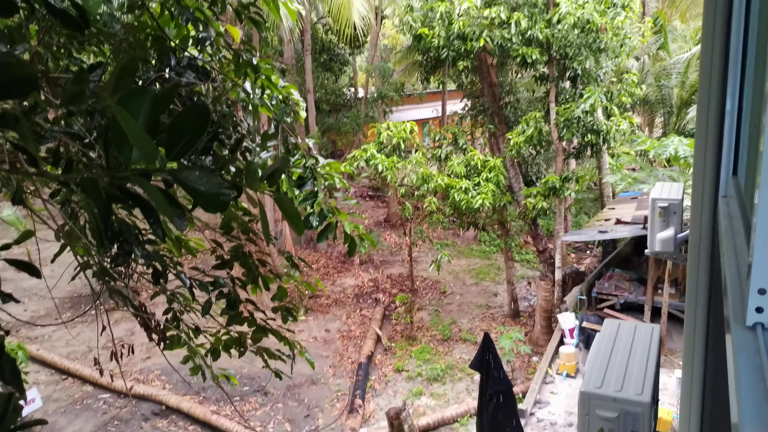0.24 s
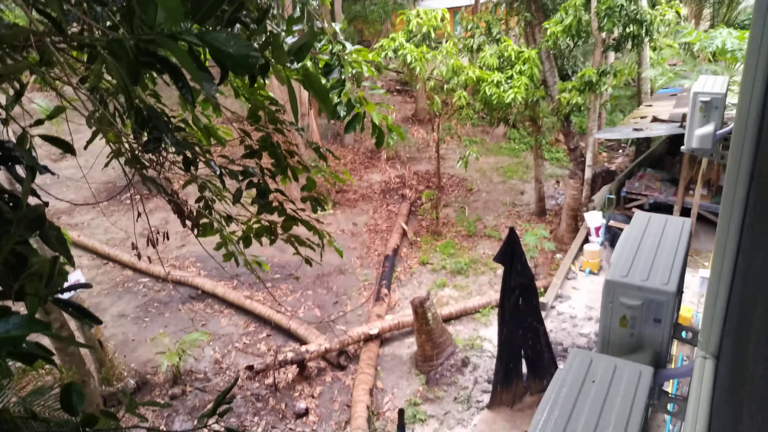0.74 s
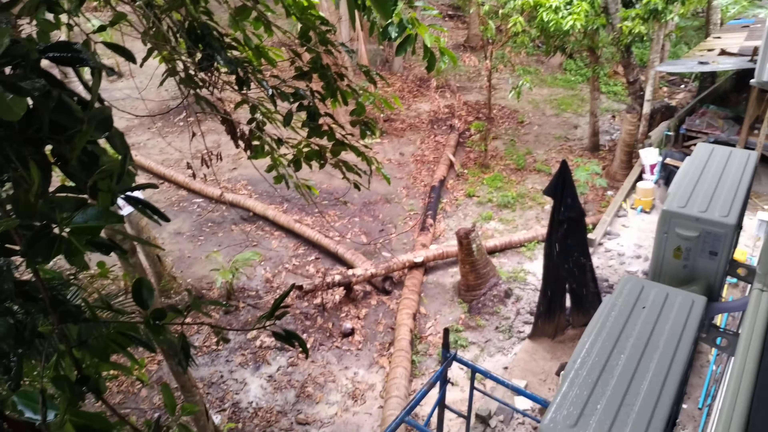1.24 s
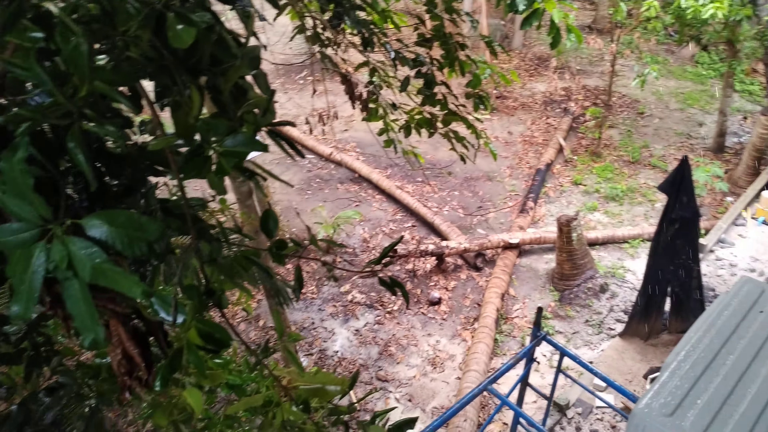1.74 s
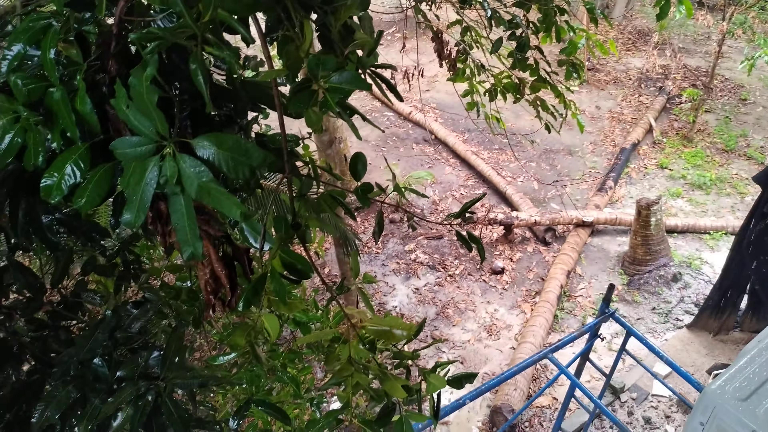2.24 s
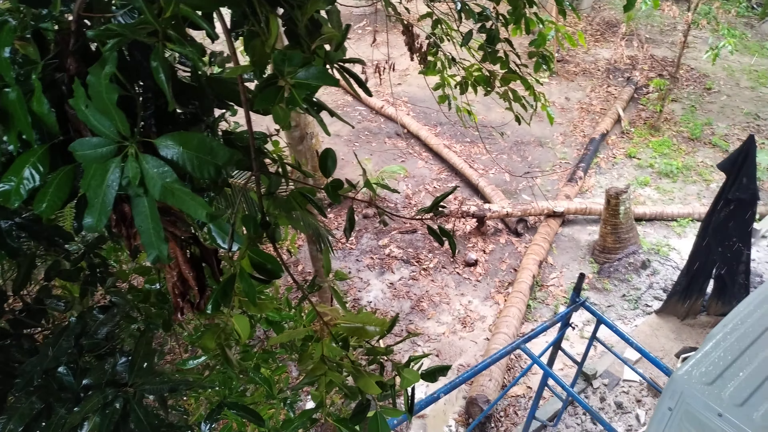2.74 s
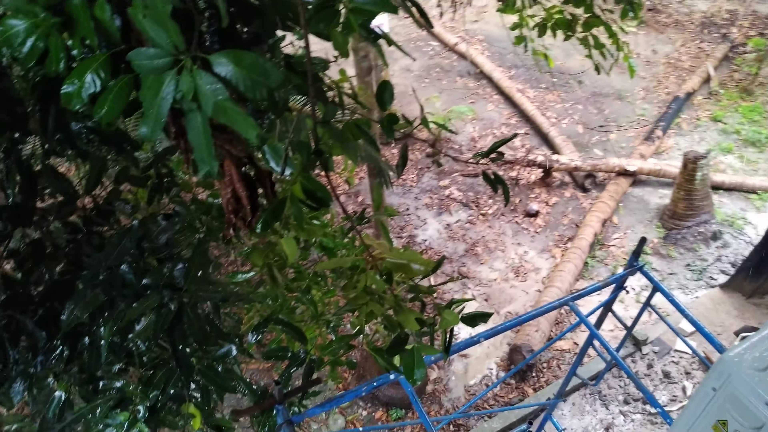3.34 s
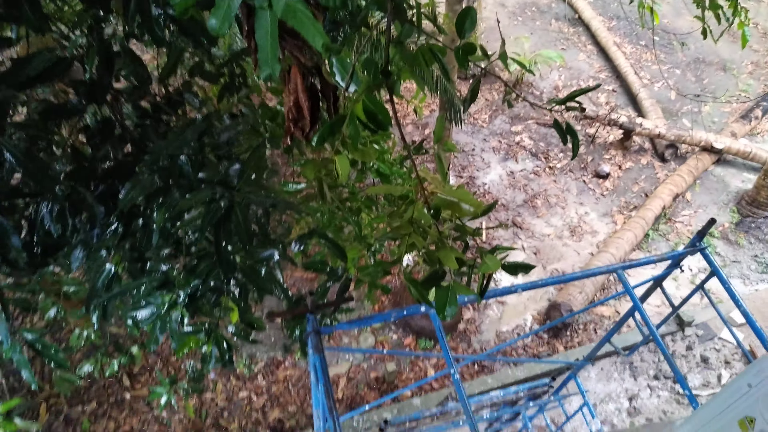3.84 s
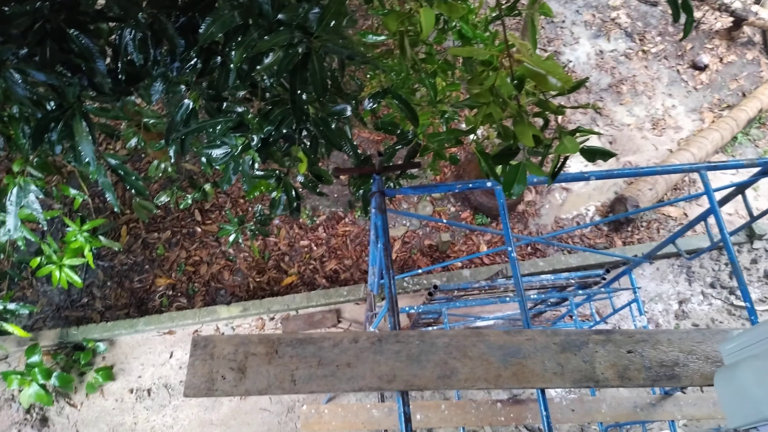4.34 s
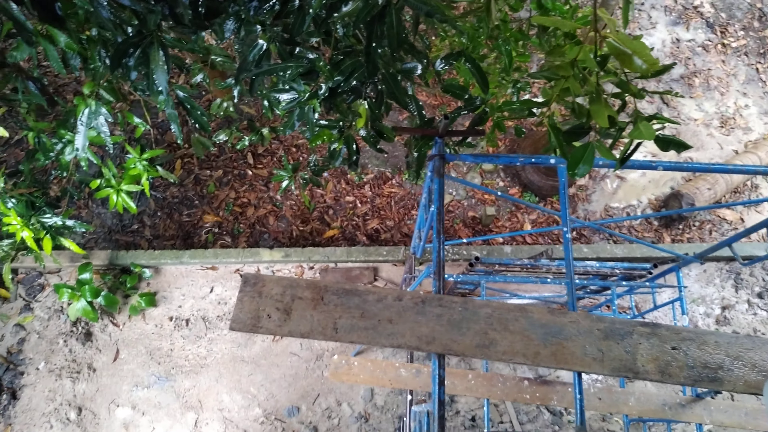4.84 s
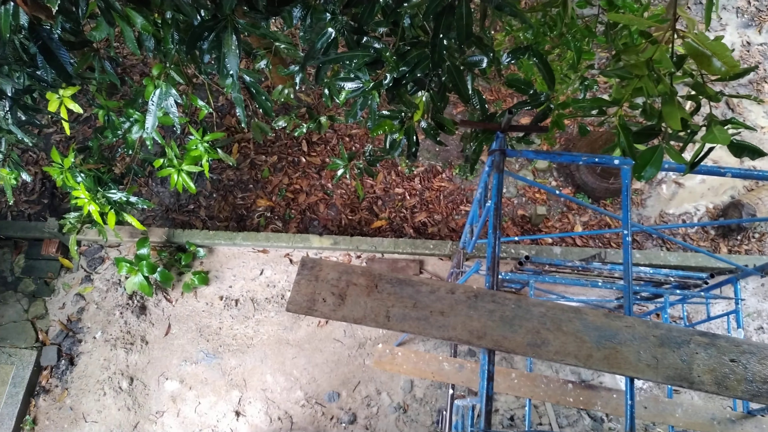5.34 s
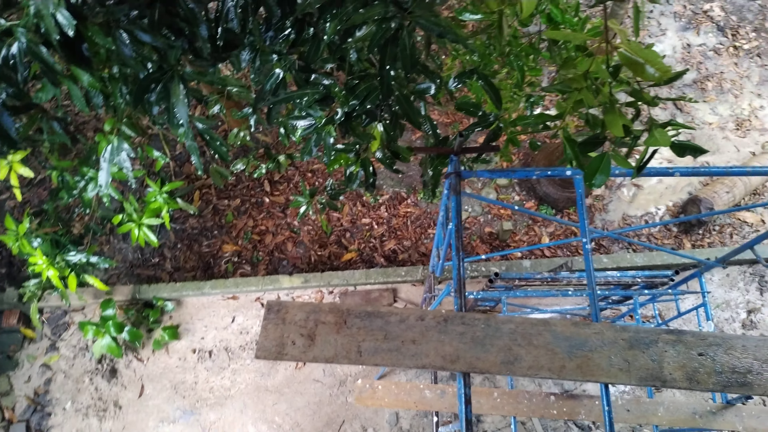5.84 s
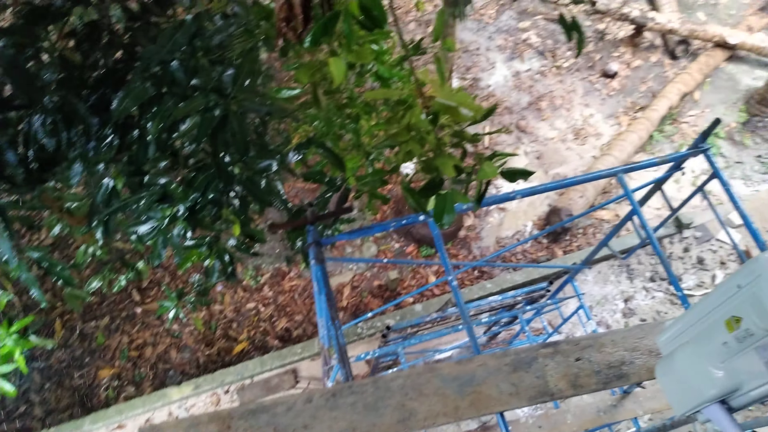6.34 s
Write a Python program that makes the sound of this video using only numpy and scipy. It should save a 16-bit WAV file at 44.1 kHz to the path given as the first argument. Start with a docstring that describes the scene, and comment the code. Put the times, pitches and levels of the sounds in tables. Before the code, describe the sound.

Outdoor stereo rain, bright and sizzling, captured by a handheld phone close to wet foliage. Fat drops slap leaves and burst into short sprays over countless merged distant drops. A sharp tap comes near the middle, followed by case bumps, a strong low puff on the right and a droplet clicking on the phone. The later part is denser and crisper, with more close ticks, a faint hum and a left-leaning gust.

```python
"""Heavy rain on a garden: fat drops slap near leaves and burst into spray, made of noise-like showers that thin out.
Close droplets tick as short resonant snaps, one drop raps on something hard, and countless far drops
merge into a flickering wash with pats, plops, plips and drizzle in front of it.
It is heard from a phone held out of an upstairs window: air rumbles and puffs on its two microphone ports,
its case knocks, a low hum fades in, and the ringing of the ports makes the rain sizzle."""
import sys
import numpy as np
from scipy import signal
from scipy.fft import rfft, irfft, next_fast_len
from scipy.io import wavfile
from scipy.ndimage import uniform_filter1d

SR = 44100
rng = np.random.default_rng(int(sys.argv[2]) if len(sys.argv) > 2 else 0)


def store_wav(level_fs):
    """Save 16-bit WAV to argv[1]."""
    pcm = np.round(np.clip(np.atleast_2d(level_fs), -1, 1) * 32767)
    wavfile.write(sys.argv[1], SR, pcm.T.astype(np.int16))


N = 290619
T = np.arange(N) / SR  # time of each sample, s

# A faint low hum that comes in as the phone tilts down
HUM_HZ, HUM_WIDTH_HZ, HUM_DB = 146, 9, -62.5
HUM_START_S, HUM_RISE_S = 3.85, 0.4
# Breeze on the ports: usual level and the size of its slow swell
BREEZE_DB, BREEZE_SWELL_DB = -57.5, 2.5
# Gusts on top of the breeze: [t/s, half length/s, level/dB, left minus right/dB]
GUST_TABLE = [(.12, 0.2, -47.5, -3), (.57, .15, -46.5, -4), (1.25, .15, -51, -3), (2.8, .2, -50, 7),
              (3.5, 0.26, -50, 1), (5.41, .14, -41.5, 18), (5.4, .05, -37, 20), (5.535, 0.04, -35.5, -12),
              (5.6, .03, -40, 0)]
# Sudden puffs of air on the right port, before filtering:
# [t/s, peak pressure swing/full scale, half length/s, turbulence level/dB]
PUFF_TABLE = [(0.649, 0.014, 0.0044, -57), (3.4396, 0.047, 0.0017, -40), (3.4836, 0.04, 0.0014, -44),
              (3.797, -0.05, 0.014, -52), (3.8003, -0.42, 0.0049, -30.5), (3.8075, 0.165, 0.0011, -31)]
# Knocks on the phone's case as the grip shifts: [t/s, level/dB, hardness of the contact f/Hz]
KNOCK_TABLE = [(3.4375, -8, 2000), (3.4437, -11, 3200), (3.4462, -14, 3200), (3.4817, -15, 380),
               (3.7925, -10, 1500), (3.8037, -7, 600), (3.8063, -2, 900)]
# Tones the case rings with: [f/Hz, width/Hz, relative level/dB]
CASE_TONES = [(160, 60, 11), (262, 75, 9), (373, 130, -2), (674, 160, -5), (910, 180, -8), (1300, 260, -3)]
PHONE_HIT_S = 3.9983

# Far rain on trees and ground: [f/Hz, level/dB per Hz]
WASH_SPECTRUM = [(30, -70), (70, -84), (105, -79.5), (150, -82), (220, -84), (400, -83.5), (700, -84),
                 (1200, -81), (2200, -78.5), (3500, -83.5), (6000, -87), (9000, -91), (14000, -91)]
# Fine drizzle on near foliage, before its small swells: [t/s, level/dB]
DRIZZLE_LEVEL = [(0, -49), (1, -50.5), (1.8, -50), (2.6, -48.5), (3.6, -47), (4.2, -44.5), (5.3, -44.5),
                 (6.6, -46.5)]
# Tones of the hard surface: [f/Hz, width/Hz, relative level/dB]
RAP_TONES = [(765, 190, -2.5), (1040, 540, -3.5), (1490, 250, -9), (1880, 220, -9)]
RAP_S = 3.0293

# The closest droplets, and at 3.0395 s the big drop's small rebound after its rap: [t/s, level/dB, pitch f/Hz,
# left minus right/dB]
TICK_TABLE = [(0.254, -20, 9000, 2), (.2549, -9.5, 3280, -4), (.406, -20, 4500, -1), (.56, -21, 300, 0),
              (.607, -20, 1450, 0), (1.027, -16, 12500, 5), (1.027, -22, 4500, -2), (1.038, -24, 12500, 6),
              (1.14, -20, 12500, 6), (2.105, -18, 10800, 3), (2.131, -22, 480, -2), (2.162, -21, 2100, 3),
              (2.305, -15.5, 6400, 0), (2.317, -21, 2200, 3), (2.4072, -22.5, 10400, 8),
              (3.0395, -19, 1100, 5), (3.0395, -22, 9500, 6), (3.7247, -14.5, 12600, 9),
              (3.7347, -19, 9000, 3), (3.839, -17, 2100, 4), (3.8398, -18.5, 1000, 6),
              (3.9547, -11, 4900, -6), (4.0725, -19.5, 8400, -6), (4.249, -19, 12500, 6),
              (4.306, -14.5, 3940, -4), (4.4066, -16.5, 8700, -4), (4.4623, -16, 8450, -9),
              (4.746, -16, 4050, -8), (4.7462, -19, 8000, -10), (4.871, -19, 10300, 10),
              (4.962, -17, 1300, 0), (5.1604, -18, 8900, -3), (5.1604, -24, 12500, 6),
              (5.43, -22, 10300, 8), (5.544, -18, 8600, -7), (5.6453, -17.5, 11000, 16),
              (5.838, -21, 5200, -3), (5.892, -16.5, 1500, 4), (5.947, -18, 5600, -7),
              (6.021, -17, 1850, 6), (6.0322, -13, 1900, 4), (6.0903, -10, 11400, 6),
              (6.1003, -16, 11600, 0), (6.145, -14.5, 8100, 2), (6.147, -17, 2200, 2),
              (6.162, -16, 4900, -7), (6.3916, -16.8, 9900, 3), (6.4004, -13.5, 6000, -5),
              (6.4004, -19, 12200, 0), (6.406, -21, 1100, 0)]
TICK_CYCLES = 6.3  # the first snap of every tick fades over the same number of cycles
# Fainter droplets fall at random times, pitches and sides
STRAY_DB, STRAY_LO_HZ, STRAY_HI_HZ, STRAY_PAN_DB = -28, 2500, 7500, 9

# The fattest drops on near leaves, before the rise and decay: [t/s, spray level/dB, leaf slap level/dB]
SPLAT_TABLE = [(0.247, -36, -34), (0.394, -38, -41), (0.495, -39.5, -45), (0.655, -41, -55),
               (0.835, -50, -40), (1.016, -39, -44), (1.135, -40.5, -54), (1.313, -37, -42),
               (1.489, -37.5, -57), (1.735, -42, -52), (2.099, -37.5, -40), (2.232, -38, -40),
               (2.297, -37.5, -35), (2.402, -37, -42), (2.47, -41.5, -40.5), (2.635, -40, -55),
               (2.86, -41, -52), (3.027, -35, -35), (3.069, -39, -39), (3.243, -41, -39),
               (3.368, -39.5, -46), (3.44, -38.5, -43), (3.721, -37, -38), (3.791, -38, -35),
               (3.827, -33.5, -43), (3.945, -35, -33.5), (4.039, -37, -40), (4.17, -39, -59),
               (4.238, -39, -48), (4.321, -38, -40), (4.406, -37, -52), (4.565, -39, -50),
               (4.734, -37, -37), (4.849, -36, -47), (4.917, -38, -51), (5.15, -44, -48), (5.241, -37, -53),
               (5.36, -37, -51), (5.418, -34, -41), (5.539, -37, -44), (5.825, -45, -41),
               (5.938, -41.5, -34.5), (6.046, -34, -41), (6.09, -32.5, -45), (6.137, -34.5, -36),
               (6.358, -38, -40), (6.389, -35, -47)]
# Lesser drops drip through the tree at a loose, even pace
DRIP_SPRAY_DB, DRIP_SLAP_DB, DRIP_SCATTER_DB = -45, -48.5, 1
# Where the near tree lies as the phone turns: [t/s, left minus right/dB]
TREE_SIDE_PATH = [(0, 0), (3.4, 3), (3.8, -2.5), (5.3, -0.5), (6.6, -3.5)]

# Microphone ports, left then right: [resonance f/Hz, width/Hz]
PORT_TABLE = [(10100, 880), (8570, 965)]
# How the phone's body colours each port: [f/Hz, left level/dB, right level/dB]
BODY_SHADING = [(1000, 0, 0), (1600, -0.3, -2.7), (2200, .5, -1), (3240, -2, 0.04), (3940, -2.5, 0),
                (5500, 0.9, -1), (6650, 0.5, -0.4), (8360, -0.9, 0), (10000, 0, -1.1), (12000, -0.5, 0.5),
                (13900, 2.5, 1)]
TOP_HZ = 14300


def undb(db):
    """Turn decibels into a plain gain."""
    return 10 ** (np.asarray(db) / 20)


def unit(x):
    """Scale to an rms of 1."""
    return x / np.sqrt(np.mean(x ** 2))


def pan(db):
    """Left and right gains, db apart, with the same total power whatever the side."""
    gains = undb([[db / 2], [-db / 2]])
    return unit(gains)


def band(x, lo_hz, hi_hz, order=2):
    """Keep the pitches between two edges."""
    edges = [lo_hz, min(hi_hz, SR / 2.1)]
    return signal.sosfilt(signal.butter(order, edges, "band", fs=SR, output="sos"), x)


def ring(x, hz, width_hz):
    """One resonance, with gain 1 at its centre."""
    return signal.lfilter(*signal.iirpeak(hz, hz / width_hz, fs=SR), x)


def walk(rate):
    """A wandering level: random steps, rate of them a second, smoothed twice; its spread is near 1."""
    k = int(SR / rate)
    steps = np.repeat(rng.standard_normal(N // k + 1), k)
    smooth = uniform_filter1d(uniform_filter1d(steps, k), k)
    return 1.42 * smooth[:N]


def add(out, s, sound):
    """Mix a sound in at time s."""
    i = max(int(s * SR), 0)
    out[:, i:i + sound.shape[-1]] += sound[..., :max(N - i, 0)]


def impacts(rate, spread_db):
    """Random tiny impacts, mostly small, a few large; each reaches the ports with its own lag and balance."""
    out = np.zeros((2, N))
    when, size, side = rng.random((int(rate * N / SR), 3)).T
    strength = undb(-spread_db * np.log(np.maximum(size, 1 / 40)))
    push = strength * rng.choice([-1, 1], len(size))
    at = (when * N).astype(int)
    lag = ((side - 0.5) * 36).astype(int)  # samples, up to 18 either way
    np.add.at(out[0], at, push * np.cos(side * np.pi / 2))
    np.add.at(out[1], (at - lag) % N, push * np.sin(side * np.pi / 2))
    return unit(out)


def plips(count, lo_hz, hi_hz, cycles, spread_db):
    """Random drops that each ring for some cycles at a pitch of their own."""
    out = np.zeros((2, N))
    t = T[:SR // 25]
    for when, pitch, size, length, side in rng.random((count, 5)):
        hz = lo_hz * (hi_hz / lo_hz) ** pitch
        turns = cycles * 4 ** (length - 0.5)  # from half to twice the usual cycles
        db = -spread_db * np.log(max(size, 1 / 60))
        # the nearer port hears it first and louder
        delay_s = np.array([[1 - side], [side]]) * 0.000591
        age = np.maximum(t - delay_s, 0) * hz  # in cycles
        tone = np.sin(2 * np.pi * age) * np.exp(-age / turns)
        add(out, when * N / SR, undb(db) * pan(12 * (side - 0.5)) * tone)
    return unit(out)


def burst(decay_s):
    """Up to 50 ms of dying splash noise with energy 1 at each port."""
    t = T[:SR // 20]
    x = rng.standard_normal((2, len(t))) * np.exp(-t / decay_s)
    return x / np.linalg.norm(x, axis=1, keepdims=True)


def hum():
    """A faint, wavering low hum far off: a narrow band of noise, alike at both ports."""
    half_hz = HUM_WIDTH_HZ / 2
    tone = unit(band(rng.standard_normal(N), HUM_HZ - half_hz, HUM_HZ + half_hz))
    return undb(HUM_DB) * tone * np.clip((T - HUM_START_S) / HUM_RISE_S, 0, 1)


def breeze():
    """Moving air rumbles on each port alone; every gust swells and falls away smoothly."""
    power = undb(BREEZE_DB + BREEZE_SWELL_DB * walk(2.0)) ** 2
    for s, half_s, db, pan_db in GUST_TABLE:
        swell = np.exp(-((T - s) / half_s) ** 2)
        power = power + (pan(pan_db) * undb(db)) ** 2 * swell
    rumble = unit(band(rng.standard_normal((2, N)), 11.5, 45.3, order=3))
    return rumble * np.sqrt(power)


def puffs(eddy_hz=330, eddy_top_hz=1550, settle_hz=5, gap_hz=1400, gap_db=2, skirt_db=-13, skirt_s=0.028):
    """A puff swings the right port's pressure both ways; its eddies ring the opening,
    amid a softer, longer low rumble that swells before and fades after."""
    out = np.zeros((2, N))
    # small eddies are weaker than large ones
    eddies = band(rng.standard_normal(N), 120, eddy_hz, order=1)
    eddies = band(eddies, 60, eddy_top_hz, order=3)
    eddies = unit(eddies + undb(gap_db) * ring(eddies, gap_hz, 350))
    skirt = undb(skirt_db) * unit(band(rng.standard_normal(N), 79, 275))
    for s, swing, half_s, eddy_db in PUFF_TABLE:
        u = (T - s) / half_s
        out[1] += swing * u * np.exp((1 - u ** 2) / 2)
        eddy_swell = np.exp(-((T - s) / (half_s + 0.0021)) ** 2)
        skirt_swell = np.exp(-((T - s) / skirt_s) ** 2)
        out[1] += undb(eddy_db) * (eddies * eddy_swell + skirt * skirt_swell)
    return signal.sosfilt(signal.butter(2, settle_hz, "high", fs=SR, output="sos"), out)


def case(blow):
    """The phone's case answers a blow with a few tones that die quickly."""
    return sum(undb(db) * ring(blow, hz, width_hz) for hz, width_hz, db in CASE_TONES)


def knocks(contact_ratio=5.0):
    """Dull knocks push the case in beside the right port; a softer contact stirs only its lower tones."""
    out = np.zeros((2, N))
    for s, db, contact_hz in KNOCK_TABLE:
        contact = band(-signal.unit_impulse(SR // 20), contact_hz / contact_ratio, contact_hz)
        body = case(contact)
        add(out, s, undb(db) * pan(-29) * body / np.linalg.norm(body))
    return out


def phone_hit(click_db=-8, port_db=-5, bright_db=-2, thud_db=-3, case_db=-3):
    """A droplet lands on the phone beside the right port: a sharp click and a small thud in the case."""
    out = np.zeros((2, N))
    blow = signal.unit_impulse(SR // 20)
    click = undb(click_db) * band(blow, 4000, 19000, order=1)
    click += undb(port_db) * ring(blow, 9300, 900)
    click += undb(bright_db) * ring(blow, 15500, 3000)
    thud = undb(thud_db) * band(blow, 180, 2100, order=3) + undb(case_db) * case(blow)
    add(out, PHONE_HIT_S, pan(-26) * (click + thud))
    return out


def wash(flicker_db=2.0, alike_hz=520):
    """Far rain is noise in half-octave bands that flicker; long waves are more alike at both ports."""
    size = next_fast_len(N)
    hz = np.maximum(np.fft.rfftfreq(size, 1 / SR), 1)
    points, db = np.transpose(WASH_SPECTRUM)
    alike = 0.92 / (1 + (hz / alike_hz) ** 4)
    mid, side = rfft(rng.standard_normal((2, size)))
    sound = mid * np.sqrt(1 + alike) + side * np.sqrt(1 - alike) * np.array([[1], [-1]])
    sound = sound * undb(np.interp(np.log(hz), np.log(points), db)) * np.sqrt(SR) / 2
    out = 0
    for k in np.arange(9, 29):  # band centres at 2 ** (k / 2) Hz
        share = np.maximum(1 - abs(2 * np.log2(hz) - k), 0)
        out = out + irfft(sound * share, size)[:, :N] * undb(flicker_db * walk(24.98))
    return out


def patter(pat_db=-58.5, plop_db=-59.0, plip_db=-54, leaf_db=-53):
    """Mid-distance drops: dull pats on soil, rare plops on wood, bright plips on puddles, dry taps on leaves."""
    pats = plips(count=1800, lo_hz=330, hi_hz=1570, cycles=1.23, spread_db=2.5)
    plops = plips(count=110, lo_hz=623, hi_hz=1500, cycles=1.8, spread_db=1.5)
    bright = plips(count=900, lo_hz=1400, hi_hz=6300, cycles=24.0, spread_db=2.5)
    taps = plips(count=650, lo_hz=2686, hi_hz=6590, cycles=8.9, spread_db=1.0)
    return undb(pat_db) * pats + undb(plop_db) * plops + undb(plip_db) * bright + undb(leaf_db) * taps


def drizzle(swell_db=1.0):
    """Fine droplets, each a tiny impact, crackle on near foliage in small flurries."""
    db = np.interp(T, *np.transpose(DRIZZLE_LEVEL)) + swell_db * walk(28.02)
    crackle = band(impacts(rate=1400, spread_db=1.0), 5200, 21300, order=1)
    return unit(crackle) * undb(db)


def rap(crack_db=-6, bright_db=-3, body_db=8, tail_db=-2):
    """One big drop cracks on a hard surface, which rings briefly; the wall throws back a short tail."""
    out = np.zeros((2, N))
    blow = signal.unit_impulse(SR // 20) + undb(tail_db) * burst(decay_s=0.012)
    body = sum(undb(db) * ring(blow, hz, width_hz) for hz, width_hz, db in RAP_TONES)
    crack = undb(crack_db) * burst(decay_s=0.002)
    crack += undb(bright_db) * band(burst(decay_s=0.00091), 12000, 18000)
    add(out, RAP_S, pan(5.3) * band(crack + undb(body_db) * body, 450, 17000))
    return out


def ticks(width_share=0.19, scatter_db=-9, click_db=-7, count=20):
    """Close droplets: a sharp contact, a very short, loosely pitched snap and a little scatter of fragments."""
    out = np.zeros((2, N))
    strays = []
    for when, pitch, side in rng.random((count, 3)):
        hz = STRAY_LO_HZ + pitch * (STRAY_HI_HZ - STRAY_LO_HZ)
        strays.append((when * N / SR, STRAY_DB, hz, STRAY_PAN_DB * (2 * side - 1)))
    for s, db, hz, pan_db in [*TICK_TABLE, *strays]:
        splash = burst(TICK_CYCLES / hz) + undb(scatter_db) * burst(decay_s=0.0083)
        snap = ring(splash, hz, hz * width_share)
        snap = snap / np.linalg.norm(snap, axis=1, keepdims=True)
        click = band(signal.unit_impulse(SR // 20), hz, hz * 2, order=1)
        click = click / np.linalg.norm(click)
        add(out, s, undb(db) * pan(pan_db) * (snap + undb(click_db) * click))
    return out


def splats(rise_s=0.0022, spray_s=0.052, slap_s=0.03, count=33):
    """Each fat drop slaps a leaf and bursts into a shower of droplets that thins out."""
    spray_power, slap_power = np.zeros((2, N)), np.zeros((2, N))
    t = T[:SR // 3]
    onset = 1 - np.exp(-t / rise_s)
    drips = []
    for k, (late, size, leaf_size) in enumerate(rng.random((count, 3))):
        spray_db = DRIP_SPRAY_DB + DRIP_SCATTER_DB * (2 * size - 1)
        slap_db = DRIP_SLAP_DB + 2 * DRIP_SCATTER_DB * (2 * leaf_size - 1)
        drips.append(((k + late) * N / SR / count, spray_db, slap_db))
    for s, spray_db, slap_db in [*SPLAT_TABLE, *drips]:
        sides = pan(np.interp(s, *np.transpose(TREE_SIDE_PATH)))
        # separate showers add in power
        add(spray_power, s, (sides * undb(spray_db) * onset * np.exp(-t / spray_s)) ** 2)
        add(slap_power, s, (sides * undb(slap_db) * onset * np.exp(-t / slap_s)) ** 2)
    droplets = unit(band(impacts(rate=4500, spread_db=1.5), 6000, 21200, order=1))
    leaf = plips(count=6000, lo_hz=2003, hi_hz=7000, cycles=3.0, spread_db=2.0)
    return np.sqrt(spray_power) * droplets + np.sqrt(slap_power) * leaf


def scene():
    """Add all the layers: the air and phone sounds, then the rain from far to near."""
    phone_and_air = hum() + breeze() + puffs() + knocks() + phone_hit()
    rain = wash() + patter() + drizzle() + rap() + ticks() + splats()
    return phone_and_air + rain


def record(dry):
    """Each port is a small air cavity that rings in the treble; the phone's body shades it; the top is cut."""
    size = next_fast_len(N + SR // 10)
    hz = np.maximum(np.fft.rfftfreq(size, 1 / SR), 1)
    points, *shades = np.transpose(BODY_SHADING)
    out = []
    for x, (port_hz, width_hz), shade_db in zip(dry, PORT_TABLE, shades):
        cavity = port_hz ** 2 / (port_hz ** 2 - hz ** 2 + 1j * hz * width_hz)
        shade = undb(np.interp(np.log(hz), np.log(points), shade_db))
        out.append(irfft(rfft(x, size) * cavity * shade, size)[:N])
    # a steep low-pass removes what lies above TOP_HZ
    return signal.sosfilt(signal.ellip(12, 0.2, 80, TOP_HZ, fs=SR, output="sos"), out)


dry = scene()
out = record(dry)
store_wav(out)
```